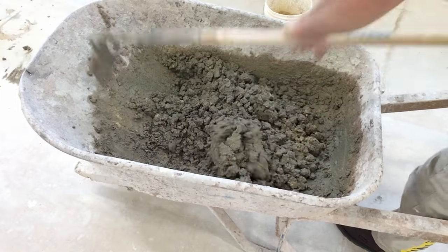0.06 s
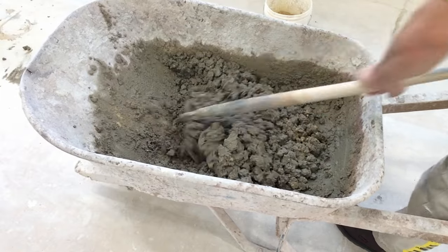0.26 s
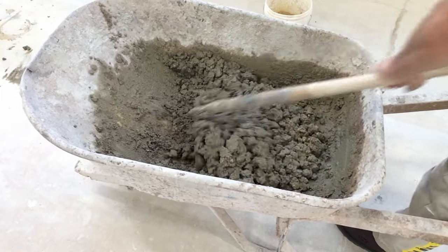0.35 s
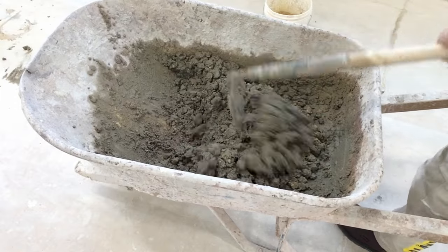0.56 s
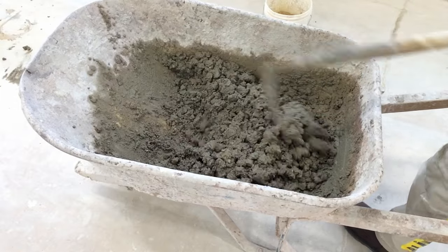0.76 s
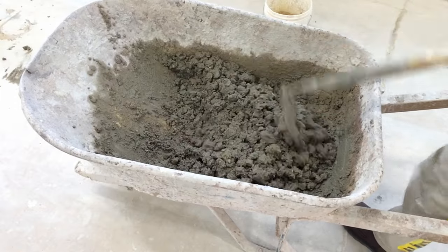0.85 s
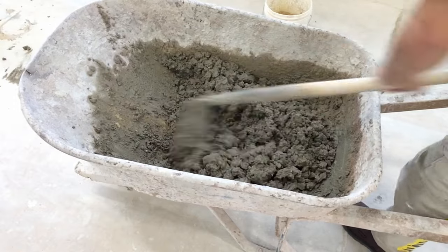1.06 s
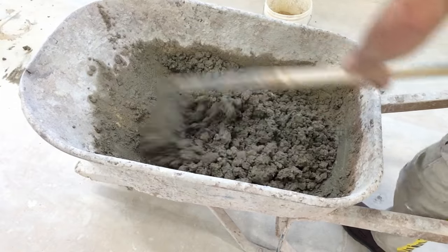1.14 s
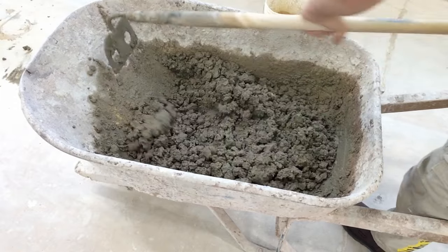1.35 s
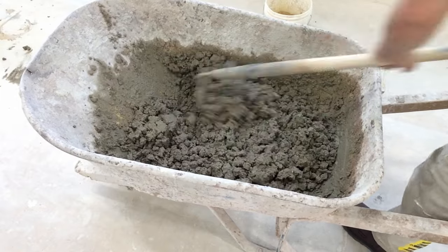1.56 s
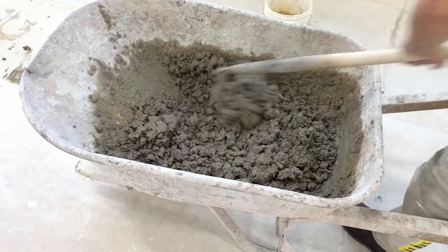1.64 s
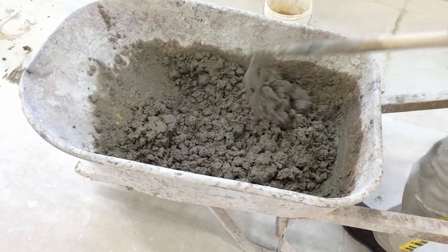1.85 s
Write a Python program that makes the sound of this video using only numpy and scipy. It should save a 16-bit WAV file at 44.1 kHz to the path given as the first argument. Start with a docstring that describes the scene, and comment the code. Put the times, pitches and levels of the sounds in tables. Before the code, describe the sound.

Concrete being mixed with a metal hoe in a steel wheelbarrow, close by. Faint pebble ticks lead to a very loud, slightly distorted crunching clang at 0.23 seconds, with tray knocks and a fading gritty scrape. After a quiet gap, a lighter bite at 0.93 and scratchy drag, dull knocks around 1.2, another crunch and scrape at 1.56, then wet clods thump at 1.8. Low outdoor rumble throughout.

```python
"""A long-handled steel tool chops and drags through stiff concrete mix in a steel wheelbarrow, heard close by.
Bites and grit are bursts of random tiny cracks, filtered to colour them; the blade and tray ring as fading sines.
Knocks are filtered taps, wet clods are short low thumps with a squash, and pebbles are brief bright crackles.
Quick reflections and a short echo follow, over a low outdoor rumble; the loudest peaks are clipped."""
import sys
import numpy as np
from scipy import signal
from scipy.fft import rfft, irfft
from scipy.io import wavfile

SR = 44100
rng = np.random.default_rng(int(sys.argv[2]) if len(sys.argv) > 2 else 0)


def transcribe(signal):
    """Save signal, clipped to [-1, 1], as a 16-bit WAV file at the path in sys.argv[1]."""
    frames = np.atleast_2d(signal).T
    limited = np.clip(frames, -1, 1)
    pcm = np.round(limited * 32767).astype(np.int16)
    wavfile.write(sys.argv[1], SR, pcm)


N = 83790
TIME = np.arange(N) / SR  # seconds

# Tones of the loaded tray. Each row: pitch in Hz, relative level in dB, time to fade by 60 dB in seconds.
TRAY_TONES = [(167.5, 1.5, 0.4), (203.6, 4, .25), (272, 2, 0.25), (471.7, -8, 0.2), (672, -3.5, 0.28),
              (698.3, -3.5, 0.22), (878, -11, 0.17), (953, -14.5, 0.3), (1257, -23.5, 0.34),
              (1525, -4, 0.16), (1736, -9.5, 0.092), (1960, -3, 0.2)]
# Colour of the fine grit and pebbles. Each row: frequency in Hz, relative power per hertz in dB.
GRIT_SHAPE = [(200, 2), (1000, -14), (2000, -0.5), (3800, -1), (5500, -6), (8000, -8.5), (11000, -13.5),
              (16000, -25)]
# Colour of the churning wet mass. Each row: frequency in Hz, relative power per hertz in dB.
CHURN_SHAPE = [(30, -47.5), (110, -14), (200, -2), (330, -0.5), (800, 4.5), (1800, 3), (3000, -11),
               (6000, -23.5), (16000, -27)]

# Tiny cracks: average number per second, and how much their sizes spread in dB
BITE_PER_S, BITE_SPREAD_DB = 11000, 1
GRIT_PER_S, GRIT_SPREAD_DB = 8400, 2
CHURN_PER_S, CHURN_SPREAD_DB = 2500, 3.0


def from_db(db):
    """Turn decibels into a gain."""
    return 10 ** (np.asarray(db) / 20)


def rms_one(x):
    """Scale a signal to an average (RMS) level of one."""
    return x / np.sqrt(np.mean(x ** 2) + 1e-20)


def colour(x, points):
    """Filter to the given shape with no sound ahead of time (minimum phase), keeping the power of white noise."""
    hz, db = np.transpose(points)
    grid = np.maximum(np.fft.rfftfreq(2 * N, 1 / SR), 1)
    shape = rms_one(from_db(np.interp(np.log(grid), np.log(hz), db)))
    # Folding the cepstrum (the spectrum of the log gain) forward gives the minimum-phase filter
    cepstrum = irfft(np.log(shape))
    cepstrum[1:N] *= 2
    cepstrum[N + 1:] = 0
    response = np.exp(rfft(cepstrum))
    return irfft(rfft(x, 2 * N) * response)[:N]


def grains(per_s, spread_db):
    """Tiny cracks at random moments, many small and a few large, scaled to RMS one."""
    sizes = from_db(spread_db * np.minimum(rng.exponential(1, N), 5))
    signs = rng.choice([-1, 1], N)
    happens = rng.random(N) < per_s / SR
    return rms_one(sizes * signs * happens)


def swell(start, rise, hold, fall_db):
    """A push that rises, holds, then falls by a steady number of dB per second."""
    age = TIME - start
    attack = np.clip(age / rise, 0, 1) ** 2
    return attack * from_db(-abs(fall_db) * np.maximum(age - rise - hold, 0))


def ringing(modes):
    """What a solid body gives after one tap: sines that fade, with alternating signs."""
    out = 0
    for k, (hz, db, t60) in enumerate(modes):
        fade = from_db(db - 60 * TIME / t60)
        out = out + (-1) ** k * fade * np.sin(2 * np.pi * hz * TIME)
    return out


def rub(force, modes):
    """A ringing body driven by a rough force, at about the level of that force."""
    tap = ringing(modes)
    return signal.fftconvolve(force, tap / np.linalg.norm(tap))[:N]


def at(start, sound):
    """Delay a sound to its start time in seconds."""
    return np.concatenate([np.zeros(max(int(start * SR), 0)), sound])[:N]


def outdoor_rumble():
    """Steady random noise, filtered to be strongest in the bass."""
    # Each row: frequency in Hz, relative power per hertz in dB.
    air_shape = [(20, -16), (50, -11.5), (100, 7), (160, 2), (300, -9), (1000, -15), (4000, -20),
                 (16000, -30.5)]
    level_db = -44.5
    return from_db(level_db) * colour(rng.standard_normal(N), air_shape)


def surroundings(x):
    """Quick reflections between the tray walls, then a diffuse echo whose treble dies first."""
    # Reflections between the walls. Each row: delay in seconds, level in dB.
    walls = [(.0013, -26), (.0029, -22), (.0047, -21)]
    echo_db, echo_delay_s, split_hz = -17.5, .012, 1400
    low_t60_s, treble_t60_s = 0.53, 0.36  # time to fade by 60 dB
    reflected = x + sum(from_db(db) * at(s, x) for s, db in walls)
    near = reflected / np.sqrt(1 + sum(from_db(db) ** 2 for s, db in walls))

    noise = rng.standard_normal(N)
    low = signal.sosfilt(signal.butter(1, split_hz, fs=SR, output="sos"), noise)
    treble = noise - low
    tail = low * from_db(-60 * TIME / low_t60_s) + treble * from_db(-60 * TIME / treble_t60_s)
    echo = signal.fftconvolve(near, at(echo_delay_s, tail / np.linalg.norm(tail)))[:N]
    return near + from_db(echo_db) * echo


def ticks():
    """Each loose pebble lands with a few milliseconds of bright crackle."""
    # Each row: start in seconds, level in dB.
    tick_table = [(0.066, -27.5), (.1045, -28), (0.118, -32), (.1655, -29.5), (0.64, -34.5), (0.683, -29.5),
                  (0.726, -25.5), (0.755, -27), (0.785, -26.5), (0.855, -34), (.878, -25.5), (0.898, -30),
                  (1.008, -7), (1.206, -16.5), (1.268, -15), (1.311, -30), (1.388, -32.5), (1.892, -27.5)]
    fade_s = 0.0026
    level = sum(at(s, from_db(db) * np.exp(-TIME / fade_s)) for s, db in tick_table)
    return colour(level * grains(BITE_PER_S, BITE_SPREAD_DB), GRIT_SHAPE)


def clods():
    """Wet clods drop back: each gives a soft thump of a cycle or two and a brief wet squash."""
    # Each row: start in seconds, level in dB, pitch in Hz.
    clod_table = [(.882, -31, 400), (1.269, -10.5, 450), (1.7765, -7.5, 466), (1.8054, -7.5, 327),
                  (1.8124, -16.5, 328), (1.827, -19.5, 314), (1.856, -16, 336)]
    peak_cycles = 0.44  # cycles until the thump's envelope is strongest
    squash_db, squash_s = -12.5, 0.0074  # level beside the thumps, fade time
    thumps, squash_level = 0, 0
    for s, db, hz in clod_table:
        age = TIME * hz / peak_cycles
        thump = age * np.exp(1 - age) * np.sin(2 * np.pi * hz * TIME)
        thumps = thumps + at(s, from_db(db) * thump)
        squash_level = squash_level + at(s, from_db(db) * np.exp(-TIME / squash_s))
    squash = colour(squash_level * rng.standard_normal(N), CHURN_SHAPE)
    return thumps + from_db(squash_db) * squash


def knocks():
    """The blade and stones knock on the tray: a damped thud with some crumbling, and a ring of the tray."""
    # Each row: start in seconds, peak level in dB, pitch in Hz, peak level of the tray ring in dB.
    knock_table = [(0.2427, 3, 610, 3.5), (.2585, 0, 650, -1.5), (.2745, -6.5, 474, -6.5),
                   (0.2909, 1.5, 245, -15), (0.482, -11.5, 1530, -41), (0.739, -29, 188, -26.5),
                   (1.2071, -1, 1030, -16), (1.2395, -4.5, 910, -11.5), (1.247, -7, 780, -31),
                   (1.2671, -2, 730, -11), (1.2749, -6, 510, -32.5)]
    thud_q = 1.65  # low, so the thud hardly rings
    crumble_db, crumble_s = -25, 0.0059  # noise level beside the tap, fade time
    out, tray = 0, ringing(TRAY_TONES)
    tray = tray / np.abs(tray).max()
    for s, db, hz, ring_db in knock_table:
        crumble = from_db(crumble_db) * rng.standard_normal(N) * np.exp(-TIME / crumble_s)
        force = crumble + (TIME == 0) + 1e-18  # the tap is one sample; the tiny offset is inaudible
        thud = signal.lfilter(*signal.iirpeak(hz, thud_q, fs=SR), force)
        thud = signal.lfilter(*signal.butter(1, 2 * hz, fs=SR), thud)  # soften the treble
        out = out + at(s, from_db(db) * thud / np.abs(thud).max() + from_db(ring_db) * tray)
    return out


def shoves():
    """The blade wedges the mix against the tray: a dull crunch, and the boom of the shuddering tray."""
    # Each row: start in seconds, level in dB, rise in seconds, hold in seconds, fall in dB per second,
    # tray ring in dB.
    shove_table = [(0.231, -4, 0.0093, 0.013, 332, -9), (1.56, -14, 0.004, 0.026, 450, -35)]
    # Each row: frequency in Hz, relative power per hertz in dB.
    shove_shape = [(25, -14), (70, -3), (130, 4), (220, 4.5), (370, -3), (700, -6), (1800, -5.5),
                   (4000, -16), (16000, -28)]
    out, force = 0, grains(CHURN_PER_S, CHURN_SPREAD_DB)
    for s, db, rise, hold, fall, ring_db in shove_table:
        push = force * swell(s, rise, hold, fall)
        crunch = from_db(db) * colour(push, shove_shape)
        boom = from_db(ring_db) * rub(push, TRAY_TONES)
        out = out + crunch + boom
    return out


def drag():
    """Sand scratches along the slipping blade while coarser stones churn and make the tray drone."""
    # Each row: time in seconds, grit on the blade in dB, churn of the wet mass in dB, drone of the tray in dB.
    drag_table = [(0, -39, -38.5, -53), (0.048, -42, -44.5, -49), (.14, -58, -52, -62),
                  (.23, -39.5, -63, -47), (0.248, -39, -6, -26), (.3, -17, -22, -30),
                  (.36, -29.5, -30.5, -36), (.47, -35, -32.5, -33.5), (.52, -41.5, -37.5, -47),
                  (0.619, -44.5, -43, -53), (.7, -38, -40, -52), (.75, -35.5, -35.5, -51),
                  (.81, -43.5, -47, -53), (0.921, -43, -47.5, -49), (0.931, -30.5, -29.5, -37),
                  (.978, -21.5, -29, -40), (0.995, -19.5, -21, -33), (1.08, -21.5, -23.5, -25.5),
                  (1.135, -22, -24, -36.5), (1.17, -35, -29, -40), (1.22, -33.5, -22.5, -40),
                  (1.278, -33, -21, -28), (1.33, -40.5, -42.5, -50), (1.369, -51, -49.5, -47),
                  (1.555, -71, -59, -61), (1.581, -18, -20.5, -53), (1.63, -21, -18, -38),
                  (1.69, -29, -27.5, -47), (1.759, -31, -27.5, -51), (1.84, -41.5, -35.5, -39),
                  (1.861, -36, -25.5, -36), (1.9, -38, -33, -39)]
    slip_per_s, slip_db = 140, 2  # the blade catches and slips: random level points per second, their spread
    s, *levels = np.transpose(drag_table)
    grit_gain, churn_gain, drone_gain = [from_db(np.interp(TIME, s, db)) for db in levels]

    wander = np.interp(TIME * slip_per_s, np.arange(N), rng.standard_normal(N))
    slip = from_db(slip_db * wander)
    grit = slip * grains(GRIT_PER_S, GRIT_SPREAD_DB)
    churn = slip * grains(CHURN_PER_S, CHURN_SPREAD_DB)

    scratch = colour(grit * grit_gain, GRIT_SHAPE)
    stones = colour(churn * churn_gain, CHURN_SHAPE)
    drone = rub(churn * drone_gain, TRAY_TONES)
    return scratch + stones + drone


def bites():
    """The blade bites into the gravel: a burst of crushing, with which the blade clinks and rings."""
    # Each row: start in seconds, level in dB, rise in seconds, hold in seconds, fall in dB per second,
    # peak level of the blade clink in dB.
    bite_table = [(0.2326, -2.5, 0.00016, 0.0089, 387, 3), (0.9255, -14, 0.00043, 0.0034, 800, -12),
                  (1.118, -17, 0.0042, .011, 900, -37), (1.554, -16.5, 0.0056, 0.025, 260, -42),
                  (1.5658, -6.5, 0.003, 0.0026, 523, -14)]
    # Tones of the blade. Each row: pitch in Hz, relative level in dB, time to fade by 60 dB in seconds.
    blade_tones = [(2744, -8.5, 0.3), (3187, 2, 0.032), (3310, 5.5, 0.033), (4544, -1, 0.11)]
    # Each row: frequency in Hz, relative power per hertz in dB.
    bite_shape = [(100, -11), (500, -7), (1500, -0.5), (3500, 3.5), (5500, -0.5), (8500, -3),
                  (12000, -10.5), (16000, -16.5)]
    blade_ring_db = -11.5
    level = sum(from_db(db) * swell(s, rise, hold, fall) for s, db, rise, hold, fall, _ in bite_table)
    force = grains(BITE_PER_S, BITE_SPREAD_DB) * level
    blade = ringing(blade_tones)
    blade = blade / np.abs(blade).max()
    clinks = sum(at(s, from_db(clink_db) * blade) for s, *_, clink_db in bite_table)
    crush = colour(force, bite_shape)
    return crush + from_db(blade_ring_db) * rub(force, blade_tones) + clinks


def scene():
    """The work in the wheelbarrow with its echo, over the rumble, alike in both channels."""
    work = bites() + shoves() + drag() + knocks() + clods() + ticks()
    mono = surroundings(work) + outdoor_rumble()
    return np.array([mono, mono])


def record(dry):
    """Peaks beyond full scale are clipped flat, then the highest treble is cut."""
    clipped = np.clip(dry, -1, 1)
    # At least 60 dB down from 16400 Hz upward
    treble_cut = signal.cheby2(16, 60, 16400, fs=SR, output="sos")
    return signal.sosfilt(treble_cut, clipped)


dry = scene()
out = record(dry)
transcribe(out)
```